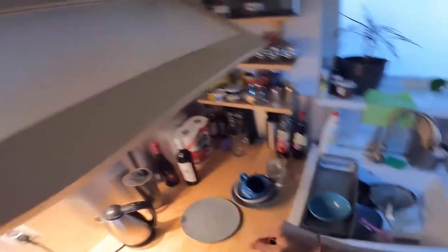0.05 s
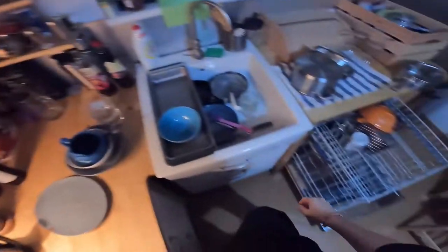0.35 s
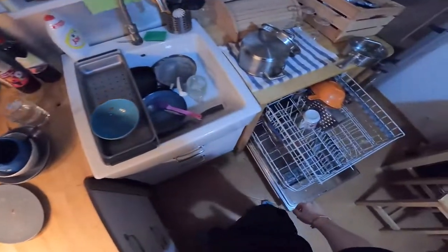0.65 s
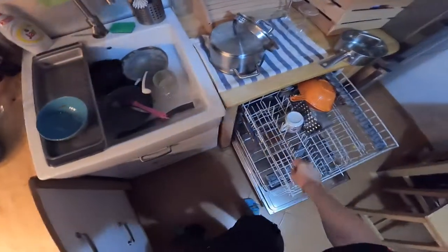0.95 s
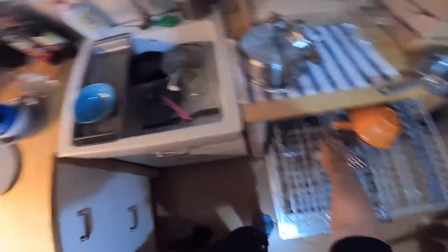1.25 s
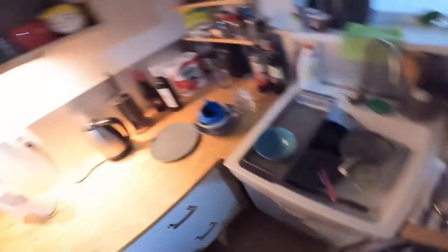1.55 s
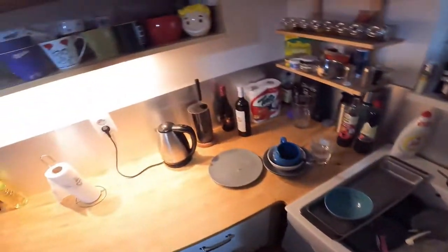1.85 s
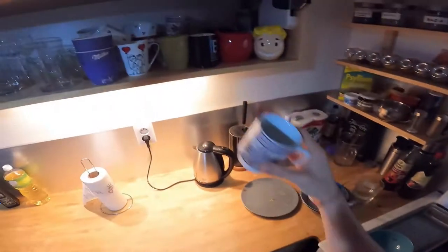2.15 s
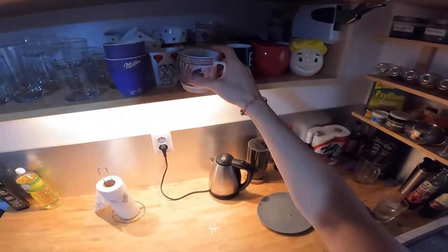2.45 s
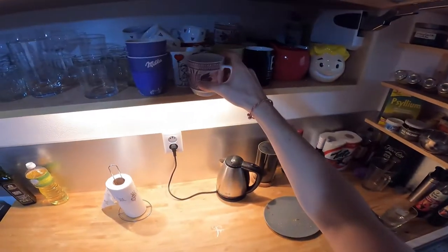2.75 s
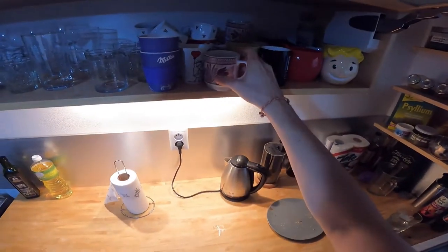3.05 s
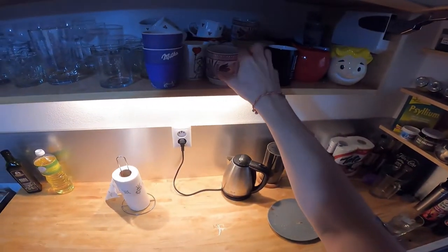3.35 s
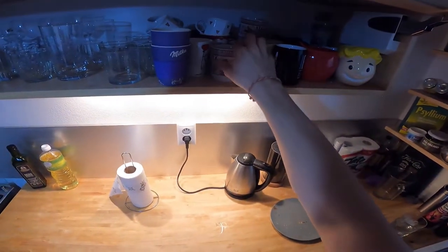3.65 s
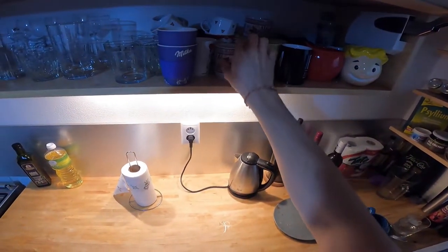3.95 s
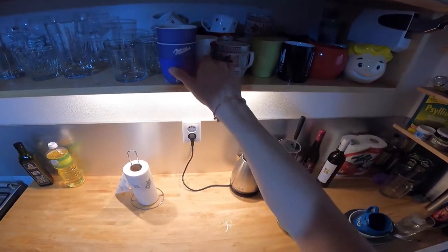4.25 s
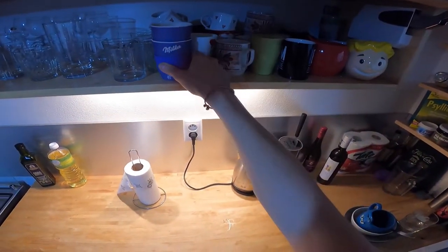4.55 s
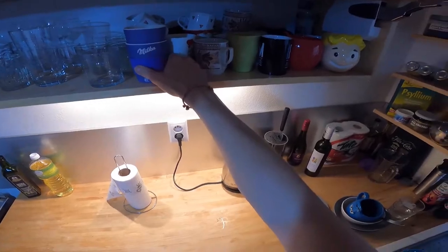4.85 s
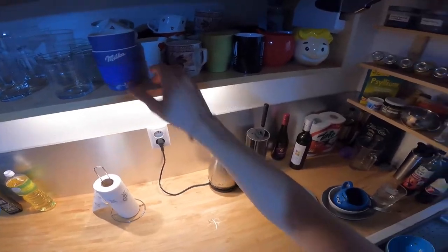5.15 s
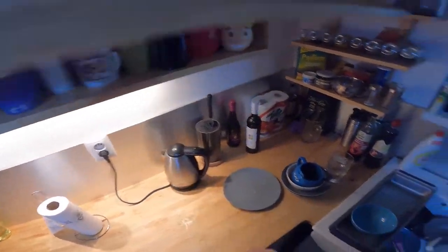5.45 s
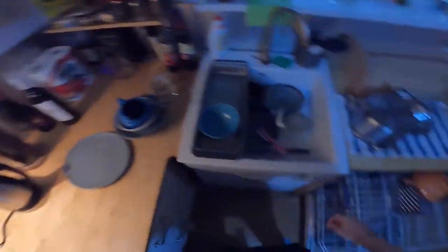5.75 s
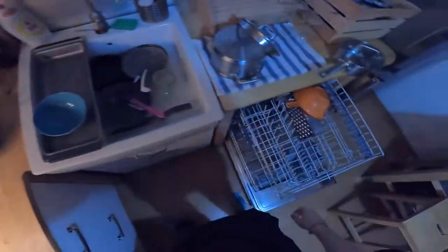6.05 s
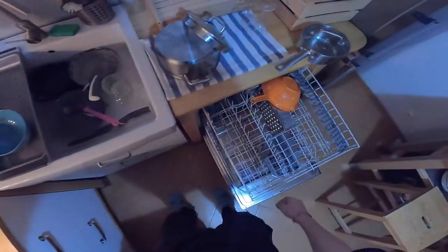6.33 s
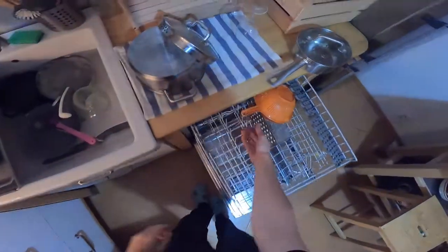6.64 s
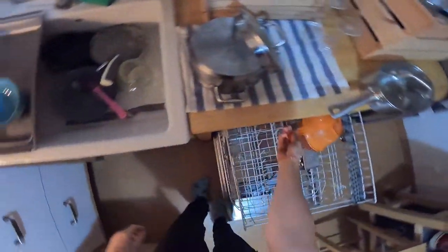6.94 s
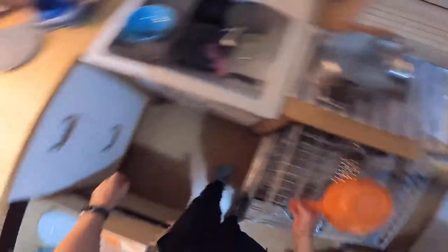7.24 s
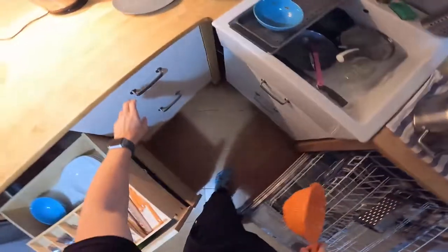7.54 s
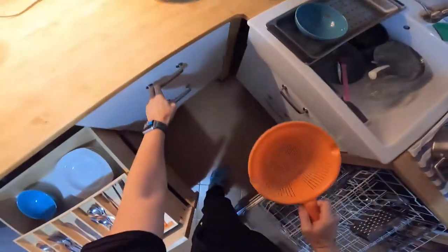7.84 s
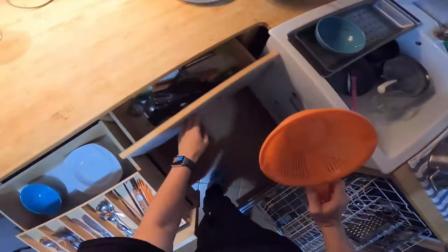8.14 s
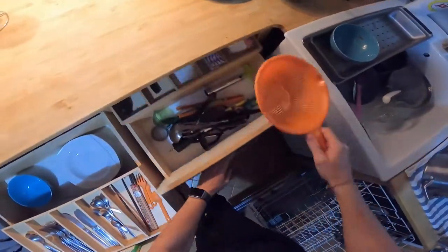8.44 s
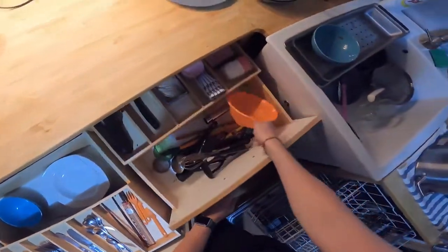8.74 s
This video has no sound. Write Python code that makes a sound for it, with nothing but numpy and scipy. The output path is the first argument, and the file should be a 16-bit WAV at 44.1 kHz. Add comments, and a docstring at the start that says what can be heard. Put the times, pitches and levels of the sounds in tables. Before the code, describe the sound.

Mugs and glasses clink and scrape on a wooden kitchen shelf, then a cupboard door bangs and a drawer rolls open to its stop.

```python
"""In a small kitchen, a glass mug is lifted from a dishwasher rack and pushed in among the crockery
on a wooden shelf, where mugs and cups clink, scrape and squeal. A cupboard door bangs, a plastic
strainer is taken from the rack, and a drawer rolls out against its stop to receive it.
Struck things ring with their own fading tones (modes); knocks, scrapes and rolling are shaped noise.
Rustling clothes, soft footsteps, the echo of the room and a faint hush lie behind it all."""
import sys
import numpy as np
from scipy import signal
from scipy.fft import rfft, irfft, next_fast_len
from scipy.io import wavfile
from scipy.ndimage import uniform_filter1d

SR = 44100
rng = np.random.default_rng(int(sys.argv[2]) if len(sys.argv) > 2 else 0)


def generate_wav(signal):
    """Clip the signal to [-1, 1] and save it as 16-bit WAV at the path in sys.argv[1]."""
    frames = np.transpose(np.atleast_2d(signal))
    scaled = np.clip(frames, -1, 1) * 32767
    pcm = np.round(scaled).astype(np.int16)
    wavfile.write(sys.argv[1], SR, pcm)


N = 392049
TIME = np.arange(N) / SR
BANDS = np.geomspace(28, 14000, 23)  # centres of the noise bands [Hz]
LEFT_VS_RIGHT = np.array([[1], [-1]])  # plus on the left, minus on the right

# The tones each thing rings with; a fade time, or t60, is how long a sound takes to fall 60 dB:
# name -> (pitch [Hz], level [dB], fade time [s])
MODES = { "mug": [(2334, -5, 0.38), (2690, 9, .28), (3140, -4, .3), (3430, 3.5, 0.034), (4200, -9, .16),
         (5580, -5, .2), (6020, -7, 0.44), (6370, 2.5, 0.22), (7140, -7, .25), (7960, -17.5, .2),
         (8800, -19, 0.32)], "jug": [(2580, -5.5, .38), (2885, 7.5, 0.42), (2880, 5.5, 0.6), (2980, 5, .35),
         (4600, -11, 0.59), (5835, -14.5, .3), (6223, -15, 0.32), (7670, -13.5, .22), (9733, -23.5, 0.33)],
         "bowl": [(2370, 8.5, 0.22), (4130, -3.5, 0.24), (6220, -2, 0.07), (6660, 2.5, 0.076),
         (7260, -10.5, 0.21)], "glass": [(2006, 3.5, 0.53), (2700, -5, 0.3), (4740, -12, .3),
         (5380, -13.5, 0.17), (7440, -9, 0.15)], "tumbler": [(2720, -6.5, 0.21), (4410, -11, .22),
         (5650, -10, .3), (5770, -14, 0.25), (6070, -7, 0.27), (7275, -13.5, 0.18), (8300, -22.5, .22)],
         "cups": [(2406, 1, 0.85), (4805, -6, 0.24), (5690, -4, 0.36), (3235, 8, 0.14), (6142, -12.5, .15),
         (8490, -15, 0.17), (9670, -17.5, 0.43)], "beaker": [(2480, -3.5, .14), (3090, 0, 0.15),
         (4860, -6, 0.18), (5404, -14, .6), (5960, 0.5, 0.089), (6650, -5, 0.073), (10130, -19.5, .22)],
         "rack": [(1782, -10, 0.33), (2430, -0.5, 0.4), (2533, -3, 0.49), (2797, -12, 0.49),
         (3250, -11, 0.4), (4230, -11, 0.37), (4520, -13, 0.32), (4920, -14, .4), (5486, -15, .4),
         (6853, -16, .3), (7343, -15, 0.3), (9750, -27, .35), (11820, -25, .27)], "basket": [(904, 0, 0.24),
         (1064, 7, 0.26), (1650, 4, 0.13)], "door": [(98.5, -3, 0.22), (118, 1, 0.76), (145, -10.5, 0.67),
         (236, -11.5, 0.17)], "drawer": [(66, -17, 0.37), (103.8, 5, 0.41), (141.3, 6, 0.53),
         (168.3, 2, 0.45), (238, 13.5, 0.079), (317, 1.5, 0.25), (366, -1.5, 0.29)],
         "cutlery": [(2270, 2, .2), (2540, 0, 0.17), (3410, -13, .15)], "strainer": [(246, -7, 0.17),
         (323, -5.5, 0.15), (573, 2.5, 0.019), (660, 0, 0.016)], "board": [(610, -0.5, 0.14),
         (659.5, 2, 0.24), (706, -8, 0.053), (934, 5.5, 0.15), (1083, 3, 0.24)],
         "shelf": [(116, -10.5, 0.25), (178.5, 5, .13), (242, -2.5, 0.078), (304, -1, 0.23),
         (461, -6, 0.17)], "floor": [(34.3, -3, 0.32), (48.7, -1, 0.18), (68, -1.5, 0.145)],
         "carcass": [(121, 0.5, 0.17), (150.7, 0, 0.19), (190.6, -10, 0.27)]}
# Crockery touching on the shelf; weight wakes the board, hardness adds treble:
# (time [s], level [dB], weight [dB], hardness [dB], piece that rings)
SHELF_CLINKS = [(2.6322, -13, -14.5, -3, "mug"), (2.7313, -25.5, -2.5, -26, "mug"),
                (2.7555, -24.5, 7, -29.5, "board"), (2.7843, -19, -48.5, -55.5, "jug"),
                (2.862, -25, -10, 5, "bowl"), (2.8696, -20.5, -21.5, -16, "bowl"),
                (3.003, -26.5, -10.5, -3.5, "tumbler"), (3.039, -13.5, -13, -13, "glass"),
                (3.0565, -16, -30, -8.5, "glass"), (3.1971, -14.5, -7.5, -3, "tumbler"),
                (3.249, -17, -9.5, 0.5, "tumbler"), (3.3086, -29, 3, -1.5, "tumbler"),
                (3.381, -20, -6, -1.5, "tumbler"), (3.412, -26.5, -10.5, -10, "tumbler"),
                (3.6198, -27, -2, -10, "cups"), (3.6572, -21, -7, 1.5, "cups"),
                (3.6966, -31, 6.5, -9.5, "cups"), (3.7434, -17, -6.5, 7.5, "cups"),
                (3.758, -22.5, -26.5, 15.5, "cups"), (3.912, -30, -5, 1, "cups"),
                (4.337, -54, 3, 8, "board"), (4.4, -24, -9.5, 2, "beaker"),
                (4.493, -51.5, 17.5, -1.5, "beaker"), (4.6142, -21.5, -6.5, 8.5, "beaker"),
                (4.628, -38.5, 4.5, -4, "board"), (4.697, -27, -9, 0.5, "beaker"),
                (4.7468, -28, 6, 11.5, "beaker"), (4.76, -22, -3, 8, "beaker"),
                (4.7881, -20, -5, -2.5, "beaker"), (4.864, -20, 5, -7, "tumbler"),
                (4.8944, -24.5, -4, 0.5, "beaker"), (4.909, -20.5, -2.5, 6, "beaker")]


def crockery_clinks(own_db=-13.5, overtone_db=-9.5, glaze_db=4.5, bounce_db=-19.0, board_db=-9.0):
    """A touched piece rings as hard as it is hit and bounces once; the board rings with it."""
    out = np.zeros((2, N))
    for s, level_db, weight_db, hardness_db, piece in SHELF_CLINKS:
        own = from_db(own_db) * ringing(MODES[piece], damped=0.44, damped_t60=0.12)
        modes = overtone_modes(hardness_db + glaze_db, longest_t60=0.36, count=36)
        overtones = from_db(overtone_db) * ringing(modes, damped=0.4)
        gain = from_db(level_db - 1.6 * LEFT_VS_RIGHT)  # a little to the right
        clink = gain * (own + overtones + sparkle(hardness_db))
        add(out, s, clink)
        add(out, s + 0.013 * rng.uniform(0.56, 1), from_db(bounce_db) * clink)
        add(out, s, from_db(level_db + weight_db + board_db) * ringing(MODES["board"]))
    return out


def overtone_modes(hardness_db, longest_t60, count):
    """The weaker tones of crockery, which change with every spot that is touched."""
    hz = rng.uniform(2200, 15300, count)
    colour_db = 20 * np.log10(clink_colour(0, hardness_db))
    level_db = np.interp(hz, BANDS, colour_db) + rng.normal(size=count)
    return list(zip(hz, level_db, longest_t60 * rng.uniform(0.29, 1, count)))


def sparkle(hardness_db, lowest_hz=7000, highest_hz=14500, db_per_octave=-19, t60=0.3, count=14):
    """The highest tones of glaze and glass: a thin shimmer, stronger on a hard hit."""
    hz = rng.uniform(lowest_hz, highest_hz, count)
    level_db = -33 + db_per_octave * np.log2(hz / lowest_hz) + hardness_db / 2
    return ringing([(f, db, t60) for f, db in zip(hz, level_db)])


# The tone colour of crockery on the shelf: (frequency [Hz], relative level [dB])
SHELF_SPECTRUM = [(53, -57), (90, -26.5), (179, 0.5), (307, 1), (373, -4), (1000, 5), (1610, -7),
                  (1960, -5.5), (2180, -9), (2830, 1.5), (5060, -20.5), (5880, -13), (7780, -39.5),
                  (12800, -57.5), (15500, -64.5)]


def clink_colour(weight_db, hardness_db, bass_db=-7.0):
    """Band gains of a clink: weight wakes the board, hardness sharpens the edge."""
    bass = ramp(775, 190)
    board = ramp(3000, 775) - bass
    edge = ramp(3000, 7750)
    return band_gains(SHELF_SPECTRUM) * from_db(bass_db * bass + weight_db * board + hardness_db * edge)


def wood_colour(weight_db, hardness_db):
    """Band gains of a tap on the shelf: the wood swallows the treble."""
    return clink_colour(weight_db, hardness_db) * from_db(-4 * ramp(1400, 2800) - 13 * ramp(6500, 9500))


# Cups landing heavily: (time [s], level [dB])
CUP_LANDINGS = [(2.756, -28.5), (4.865, -15.5), (4.897, -24.5)]


def shelf_thumps(lowest_hz=115):
    """A cup lands on the shelf with a short wooden thump, its deep bass filtered out."""
    out = np.zeros((2, N))
    for s, level_db in CUP_LANDINGS:
        add(out, s, from_db(level_db) * ringing(MODES["shelf"]))
    return signal.sosfilt(signal.butter(3, lowest_hz, "high", fs=SR, output="sos"), out + 1e-18)


# Crockery pushed along the shelf: (start [s], length [s], level [dB])
CUP_PUSHES = [(2.768, 0.32, -37), (3.066, 0.48, -41), (3.59, 0.29, -42.5), (3.806, 0.085, -35.5),
              (4.33, 0.26, -47.5), (4.723, 0.29, -28.5)]


def crockery_scrapes(grating_db=-1.0, rasp_db=-31.0, top_hz=10000):
    """Rough cup bottoms grate over the board; the tiny slips make the cups ring on after each push."""
    push = np.zeros(N)
    for s, length_s, level_db in CUP_PUSHES:
        add(push, s, from_db(level_db) * stroke(length_s, rise_s=0.034, t60=0.12))
    slips = friction(slips_per_s=210, spread_db=-1.0, rub=0.33)
    rasp = 0
    for hz, mode_db, t60 in MODES["cups"]:
        width_hz = np.log(1000) / (np.pi * t60)
        mode = signal.lfilter(*signal.iirpeak(hz, hz / width_hz, fs=SR), push * slips + 1e-18)
        rasp = rasp + from_db(mode_db) * np.sqrt(SR / (np.pi * width_hz)) * mode
    low_pass = signal.butter(2, top_hz, fs=SR, output="sos")
    grating = signal.sosfilt(low_pass, push * coloured(slips, SHELF_SPECTRUM) + 1e-18)
    return from_db(grating_db) * grating + from_db(rasp_db) * rasp


# A rack wire creaks, and crockery squeals or rings briefly:
# (start [s], length [s], pitch [Hz], level [dB])
SQUEAKS = [(1.4, 0.04, 890, -49), (2.318, 0.06, 7320, -65), (2.321, 0.067, 2520, -65),
           (3.063, 0.12, 2006, -21), (3.244, 0.032, 7275, -26), (3.75, 0.042, 8500, -35.5),
           (3.753, 0.022, 5690, -18.5), (3.864, 0.088, 5690, -34), (3.901, 0.037, 587, -29.5),
           (4.795, 0.035, 5960, -33.5), (4.883, 0.035, 5404, -21.5)]


def squeaks(pitch_waver=0.0064, flutter_db=2.0):
    """Quick sticking and slipping holds one tone, whose pitch and strength waver with the pressure."""
    out = np.zeros(N)
    for s, length_s, hz, level_db in SQUEAKS:
        wander = uniform_filter1d(rng.standard_normal(SR), size=150)
        pressure = rms_one(uniform_filter1d(wander, size=100))[:int(length_s * SR)]
        tone = np.sin(2 * np.pi * np.cumsum(hz * (1 + pitch_waver * pressure)) / SR)
        flutter = rms_one(from_db(flutter_db * pressure))
        add(out, s, from_db(level_db) * flutter * tone * signal.windows.tukey(len(tone), 0.5))
    return out


# Small ticks and hard knocks on rack, door and drawer:
# (time [s], level [dB], weight [dB], hardness [dB], thing that rings, if any)
FURNITURE_KNOCKS = [(0.095, -61, -9, 25, ""), (0.1746, -57, -12, 10, ""), (0.3067, -38, 11, 13.5, ""),
                    (0.774, -44, -20, 2, ""), (1.292, -56.5, 26, -22, "rack"),
                    (1.5144, -40.5, 0, -17, "basket"), (1.57, -40.5, 3, 28.5, "rack"),
                    (1.604, -43, -17, 26, "rack"), (1.592, -46, 1, 31, "basket"), (5.317, -62, -7, 8.5, ""),
                    (5.7371, -37, 2, 16.5, ""), (6.0672, -40.5, -22, -39, ""),
                    (6.161, -17, 1, -5.5, "door"), (6.1841, -22.5, 7, -8, "door"), (6.985, -45, -7, 29, ""),
                    (7.1, -46, 14, 10, "strainer"), (7.1591, -34, 4, 22.5, "strainer"),
                    (7.457, -50.5, -14, 21.5, ""), (8.034, -40, 0, -7, "cutlery"), (8.274, -43, 2, 25, ""),
                    (8.3351, -15.5, -6, 10.5, "drawer"), (8.3717, -33, 5, -2, "drawer"),
                    (8.8111, -36.5, 12, -19, "strainer"), (8.874, -27.5, 11.5, 15, "strainer")]


def furniture_rings(boom_db=-3.5, mug_db=6, wires_db=-10.5, wire_gap_s=0.022):
    """Things boom with the weight of a knock; on the rack the mug rings and twangs over three wires."""
    out = np.zeros((2, N))
    for s, level_db, weight_db, hardness_db, thing in FURNITURE_KNOCKS:
        if thing == "rack":
            add(out, s, from_db(level_db + mug_db) * ringing(MODES[thing]))
            for k in range(3):  # each wire is 1 dB softer than the last
                twang = ringing(overtone_modes(hardness_db + 1, longest_t60=0.25, count=24))
                add(out, s + k * wire_gap_s, from_db(level_db + wires_db - k) * twang)
        elif thing:
            add(out, s, from_db(level_db + weight_db + boom_db) * ringing(MODES[thing]))
    return out


# The tone colour of a knock on the cabinets: (frequency [Hz], relative level [dB])
CABINET_SPECTRUM = [(24, -45), (40, 15), (76, 3.5), (126, 15), (197, 2), (368, 5.5), (700, 0.5), (1100, 4),
                    (3400, 0), (6000, -16.5), (8000, -37), (15500, -52)]


def knock_colour(weight_db, hardness_db):
    """Band gains of a knock: weight deepens it, hardness sharpens the edge."""
    boost_db = weight_db * ramp(3000, 190) + hardness_db * ramp(3000, 7750)
    return band_gains(CABINET_SPECTRUM) * from_db(boost_db)


def wood_knocks(shelf_db=7.0, cabinet_db=0.5):
    """Each hit on shelf or cabinet is a sharp snap and a short chatter of the wood's crowded tones."""
    shelf = hit_envelopes(SHELF_CLINKS, wood_colour,
                          chatter_t60=0.064, snap=0.24, snap_t60=0.02, bass_hold_s=0.12)
    cabinets = hit_envelopes(FURNITURE_KNOCKS, knock_colour,
                             chatter_t60=0.14, snap=0.91, snap_t60=0.0075, bass_hold_s=0.028)
    envelopes = from_db(shelf_db) * shelf + from_db(cabinet_db) * cabinets
    return noise_in_bands(envelopes, rng.standard_normal((2, 2, N)))


# Rustling clothes, shuffling steps, and the rack, mug, door, strainer and drawer being moved:
# (start [s], length [s], level [dB], weight [dB], hardness [dB])
MOVEMENTS = [(0.0, 0.39, -54, -4, -1), (0.282, 0.081, -54.5, 16.5, 27), (0.976, 0.15, -48.5, -3, 11),
             (1.067, 0.35, -50, 8.5, 8), (1.499, 0.14, -43, -5.5, 17.5), (1.71, 0.69, -69.5, 17.5, 9),
             (5.302, 0.37, -59.5, -8.5, -33), (5.713, 0.17, -57, 16, 16.5), (6.09, 0.076, -63.5, 17, 29),
             (6.507, 0.24, -53.5, -1.5, 13), (6.945, 0.19, -47.5, 9, 19), (7.134, .11, -41.5, 6.5, 14),
             (7.363, 0.24, -76, 20.5, 34.5), (7.675, 0.17, -56.5, 5.5, 15.5), (7.85, 0.13, -44.5, -1.5, 3),
             (7.943, 0.15, -35.5, -3, 1.5), (8.12, 0.33, -35, -7, 0), (8.472, 0.26, -47, 1.5, -3.5)]
# The tone colour of these movements: (frequency [Hz], relative level [dB])
MOVEMENT_SPECTRUM = [(15, -39.5), (25, -3.5), (75, -2), (144, -1.5), (274, -7), (359, -5), (509, -13.5),
                     (703, -10.5), (826, -15), (1490, -18.5), (1620, -20.5), (4870, -37), (12500, -61.5),
                     (15500, -74)]


def rolling_and_rustling(gain_db=0.5, jolt_db=2.0, rumble_hz=190, rattle_hz=775, fine_hz=4200):
    """Moving things rub and rattle in little jolts: heavy ones rumble, hard ones sound brighter."""
    envelopes = np.zeros((len(BANDS), N))
    lows, highs = ramp(rattle_hz, rumble_hz), ramp(rattle_hz, fine_hz)
    for s, length_s, level_db, weight_db, hardness_db in MOVEMENTS:
        gains = from_db(level_db + weight_db * lows + hardness_db * highs)
        colour = band_gains(MOVEMENT_SPECTRUM) * gains
        add(envelopes, s, colour[:, None] * stroke(length_s, rise_s=0.041, t60=0.36))
    wander = rms_one(uniform_filter1d(rng.standard_normal(N), size=600))
    jolts = rms_one(from_db(jolt_db * wander))
    slips = [friction(slips_per_s=350, spread_db=3.5, rub=0.55) for _ in range(4)]
    return from_db(gain_db) * noise_in_bands(envelopes, jolts * np.reshape(slips, (2, 2, N)))


# Feet landing on the floor: (time [s], level [dB])
FOOTSTEPS = [(0.334, -27), (1.025, -18), (1.468, -19), (1.579, -27.5), (2.099, -26), (2.248, -19),
             (5.766, -22.5), (7.469, -28.5)]
# Rack and door nudging the cabinets: (time [s], level [dB])
CABINET_BUMPS = [(0.334, -21.5), (0.371, -18), (0.431, -24.5), (1.115, -22.5), (1.149, -20.5),
                 (1.267, -17.5), (1.314, -23), (5.766, -29.5), (5.868, -28.5), (7.98, -20)]


def steps_and_bumps(rise_s=0.032):
    """Soft pushes wake only the lowest tones of the floor and the cabinet bodies."""
    out = np.zeros((2, N))
    onset = 1 - np.exp(-TIME[:SR] / rise_s)
    for rows, thing in [(FOOTSTEPS, "floor"), (CABINET_BUMPS, "carcass")]:
        for s, level_db in rows:
            add(out, s, onset * from_db(level_db) * ringing(MODES[thing]))
    return out


# How the kitchen echoes: (frequency [Hz], fade time [s], level [dB], left-right likeness [0 to 1])
ROOM_ECHO = [(29.4, 1, 2, 0.47), (118, 0.13, -4.5, 1), (250, 0.46, -0.5, 0.97), (890, 0.48, 1, 0.86),
             (2480, 0.44, -2, 0.6), (5690, 0.45, -0.5, 0.38), (12800, 0.077, -3.5, 0.12)]


def kitchen_echo(sound, build_s=0.002):
    """Reflections build up within milliseconds, then each band dies away at its own pace."""
    t, tail = TIME[:SR], 0
    for hz, share in zip(BANDS, np.sqrt(np.gradient(BANDS) * 2 / SR)):
        noise = band_pass(stereo_noise(hz, *rng.standard_normal((2, SR))), hz)
        echoes = noise * fade(t, at_hz(ROOM_ECHO, hz)) * (1 - np.exp(-t / build_s))
        tail = tail + rms_one(echoes) / np.sqrt(SR) * share * from_db(at_hz(ROOM_ECHO, hz, column=2))
    return signal.fftconvolve(sound.mean(axis=0)[None], tail, axes=1)[:, :N]


# The tone colour of the quiet room: (frequency [Hz], relative level [dB])
HUSH_SPECTRUM = [(15, -30), (25, 13.5), (58, 1.5), (91, -30), (140, -1), (188, -2), (378, -11),
                 (804, -24.5), (1300, -12.5), (6050, -28), (15500, -57.5)]


def room_hush(level_db=-58, width=0.5):
    """The faint, steady rumble and hiss of the home."""
    mid, side = coloured(rng.standard_normal((2, N)), HUSH_SPECTRUM)
    return from_db(level_db) * (mid + width * side * LEFT_VS_RIGHT)


def ringing(modes, damped=0, damped_t60=0.0067, uneven_db=3.5, detune=0.0027, rise_s=0.0005):
    """One strike: each tone beats with a close twin; a `damped` part dies while the pieces touch."""
    out = np.zeros((2, SR))
    for hz, level_db, t60 in modes:
        t = TIME[:int(min(t60 + damped_t60, 1) * SR)]
        sides = min(hz / 4000, 1) * LEFT_VS_RIGHT  # high tones differ more between the ears
        strength = from_db(level_db + uneven_db * rng.normal() + uneven_db * rng.normal() * sides)
        phase = 2 * np.pi * hz * t
        tone = np.sin(phase + 0.33 * rng.normal() * sides)
        twin = 0.14 * np.sin(phase * (1 + detune * rng.normal()))
        envelope = (1 - np.exp(-t / rise_s)) * (fade(t, t60) + damped * fade(t, damped_t60))
        add(out, 0, rng.choice([-1, 1]) * strength * (tone + twin) * envelope)
    return out


def hit_envelopes(hits, colour, chatter_t60, snap, snap_t60, bass_hold_s, rise_s=0.00045):
    """How loud each band is over time for a list of hits; the lows hang on longer."""
    t, envelopes = TIME[:SR // 4], np.zeros((len(BANDS), N))
    band_t60 = chatter_t60 + bass_hold_s * BANDS[0] / BANDS[:, None]
    shape = (fade(t, band_t60) + snap * fade(t, snap_t60)) * (1 - np.exp(-t / rise_s))
    for s, level_db, weight_db, hardness_db, _ in hits:
        add(envelopes, s, shape * from_db(level_db) * colour(weight_db, hardness_db)[:, None])
    return envelopes


def stroke(length_s, rise_s, t60):
    """The loudness of one movement: it rises, holds and dies away."""
    t = TIME[:int((length_s + t60) * SR)]
    return np.minimum(t / rise_s, 1) * fade(np.maximum(t - length_s, 0), t60)


def friction(slips_per_s, spread_db, rub):
    """Tiny slips of uneven size on top of an even rub."""
    sizes = from_db(spread_db * np.minimum(rng.exponential(1, N), 4)) * rng.choice([-1, 1], N)
    slips = rms_one(sizes * (rng.random(N) < slips_per_s / SR))
    return rms_one(slips + rub * rng.standard_normal(N))


def noise_in_bands(envelopes, noise_pairs):
    """Fill each band's envelope with noise; neighbouring bands use different pairs of noises."""
    return sum(band_pass(envelopes[k] * stereo_noise(hz, *noise_pairs[k % 2]), hz)
               for k, hz in enumerate(BANDS))


def stereo_noise(hz, mid, side):
    """Mix two noises into left and right, as alike as the room makes them at this frequency."""
    apart = np.clip((1 - at_hz(ROOM_ECHO, hz, column=3)) / 2, 0, 0.5)
    return np.sqrt(1 - apart) * mid + np.sqrt(apart) * side * LEFT_VS_RIGHT


def band_pass(x, hz):
    """Keep one band, boosted so that white noise stays as strong as it was."""
    half_step = np.sqrt(BANDS[1] / BANDS[0])
    low, high = hz / half_step, hz * half_step
    sos = signal.butter(2, [low, high], "band", fs=SR, output="sos")
    return signal.sosfilt(sos, x + 1e-18) * np.sqrt(SR / 2 / (high - low))


def band_gains(spectrum):
    """Share a total power of 1 among the bands, following a spectrum."""
    gain = from_db(at_hz(spectrum, BANDS)) * np.sqrt(BANDS)
    return gain / np.linalg.norm(gain)


def coloured(noise, spectrum):
    """Give white noise a tone colour without changing its strength."""
    size = next_fast_len(N)
    gain = from_db(at_hz(spectrum, np.arange(size // 2 + 1) * SR / size + 1))
    return irfft(rfft(noise, size) * rms_one(gain), size)[..., :N]


def ramp(from_hz, to_hz):
    """For each band, a share that grows from 0 at one frequency to 1 at the other."""
    return np.clip(np.log(BANDS / from_hz) / np.log(to_hz / from_hz), 0, 1)


def at_hz(table, hz, column=1):
    """Read between the rows of a table, on a log-frequency scale."""
    table = np.array(table)
    return np.interp(np.log(hz), np.log(table[:, 0]), table[:, column])


def fade(t, t60):
    """A gain that falls 60 dB every t60 seconds."""
    return from_db(-60 * t / t60)


def from_db(db):
    """Turn decibels into a gain."""
    return np.exp(np.asarray(db) * (np.log(10) / 20))


def rms_one(x):
    """Scale to an average strength (rms) of 1."""
    return x / np.sqrt(np.mean(x ** 2) + 1e-20)


def add(track, s, sound):
    """Mix a sound into a track, starting at s seconds."""
    start = round(s * SR)
    track[..., start:start + sound.shape[-1]] += sound[..., :N - start]


def scene(tone_echo_db=-5.5):
    """Noises and ringing tones, with their echo and the hush of the room."""
    noises = wood_knocks() + crockery_scrapes() + rolling_and_rustling()
    tones = crockery_clinks() + shelf_thumps() + furniture_rings() + squeaks() + steps_and_bumps()
    return noises + tones + kitchen_echo(noises + from_db(tone_echo_db) * tones) + room_hush()


# How the two microphones differ: (frequency [Hz], left minus right [dB])
MIC_BALANCE = [(60, -1.5), (180, 0), (550, 0), (1650, 2.5), (4970, -0.5), (15000, -1)]


def record(dry, bass_lag_s=0.00004, lag_corner_hz=5000, cutoff_hz=15600):
    """Two close microphones: the left hears later, mostly in the lows; the very top is cut off."""
    size = next_fast_len(N + SR)
    hz = np.arange(size // 2 + 1) * SR / size
    lag_s = np.array([[bass_lag_s], [0]]) / np.hypot(1, hz / lag_corner_hz)
    balance = from_db(at_hz(MIC_BALANCE, hz + 1) / 2 * LEFT_VS_RIGHT)
    heard = irfft(rfft(dry, size) * balance * np.exp(-2j * np.pi * hz * lag_s), size)[:, :N]
    return signal.sosfilt(signal.ellip(10, 0.1, 80, cutoff_hz, fs=SR, output="sos"), heard)


dry = scene()
out = record(dry)
generate_wav(out)
```